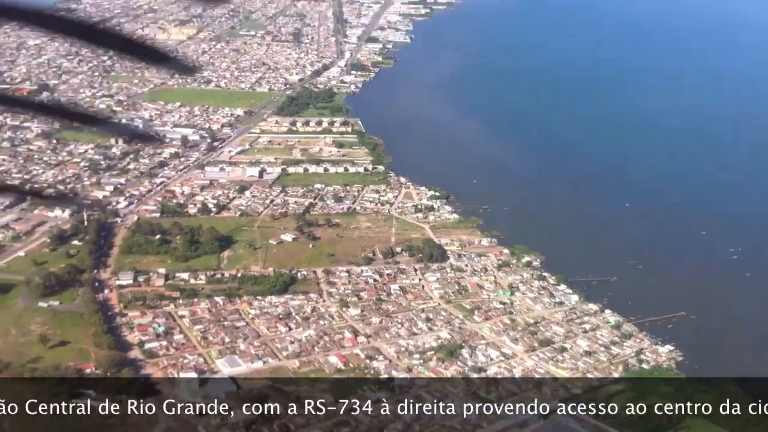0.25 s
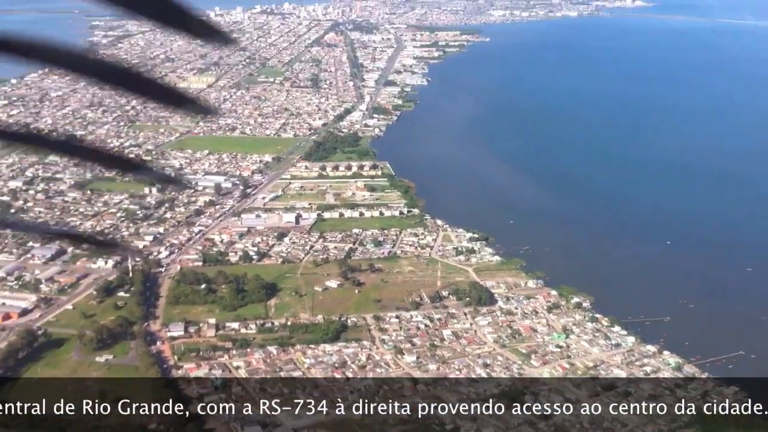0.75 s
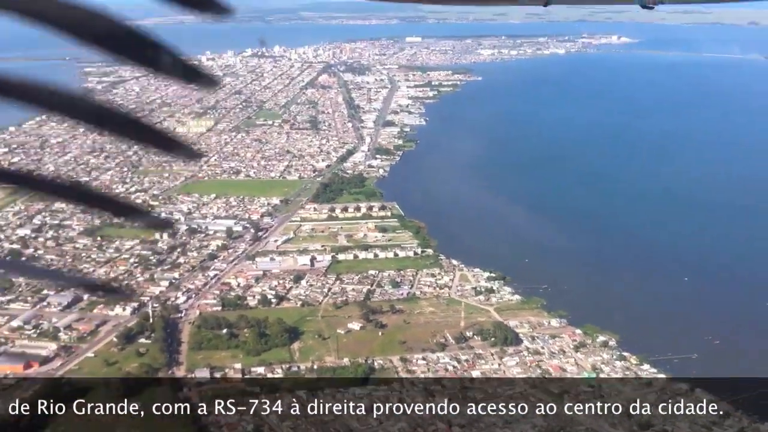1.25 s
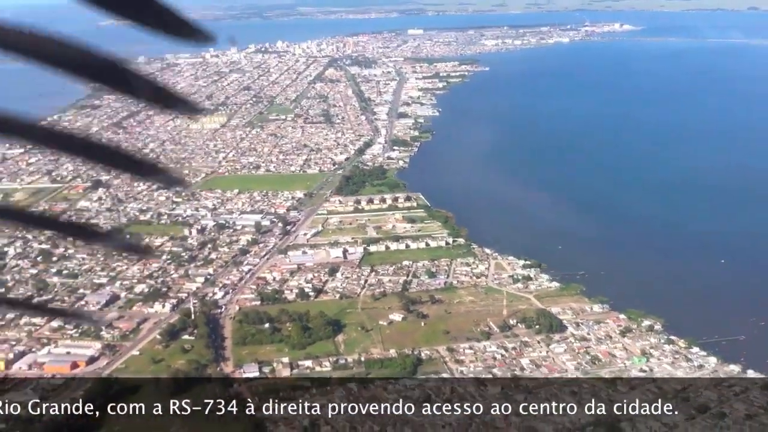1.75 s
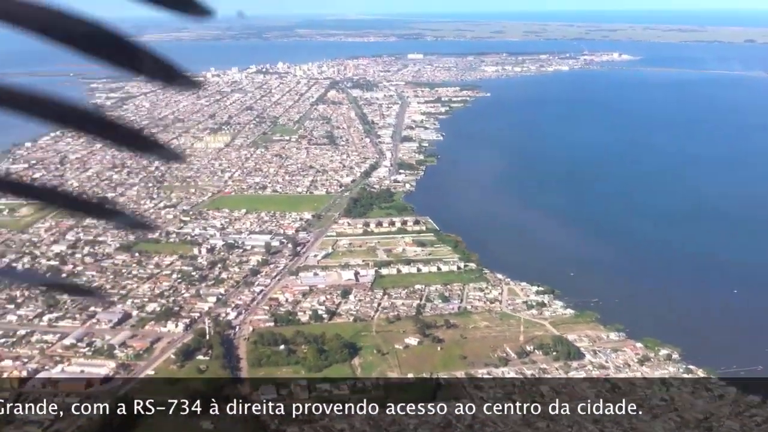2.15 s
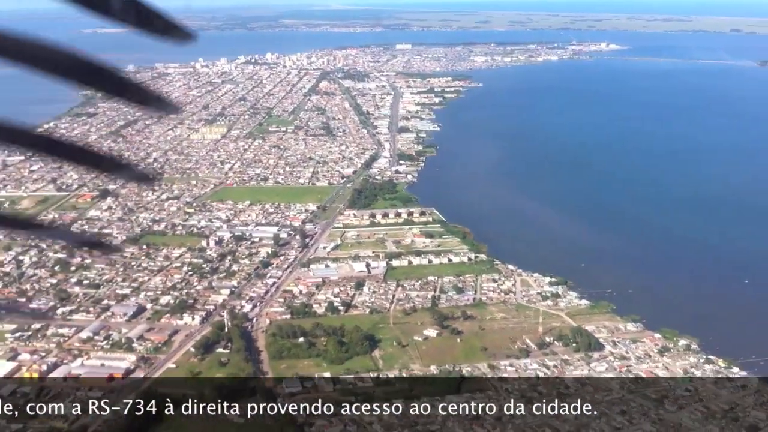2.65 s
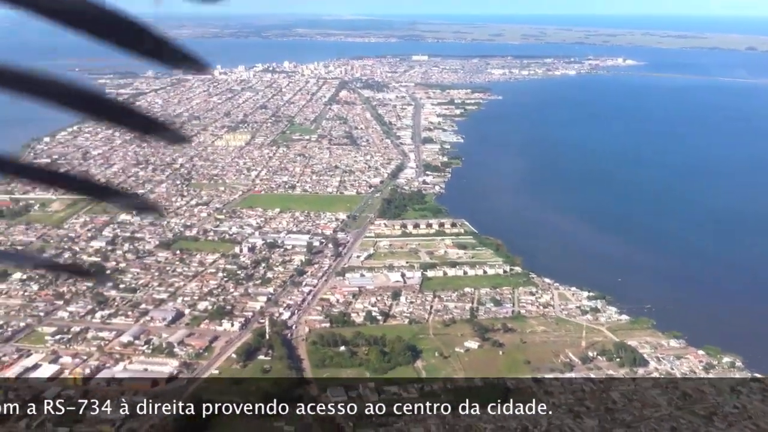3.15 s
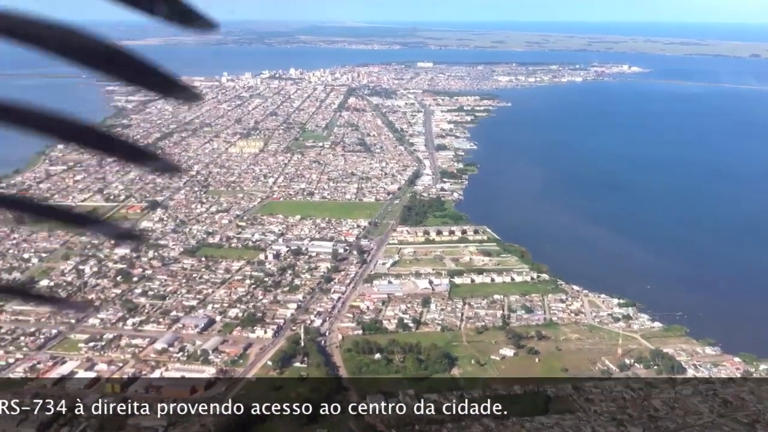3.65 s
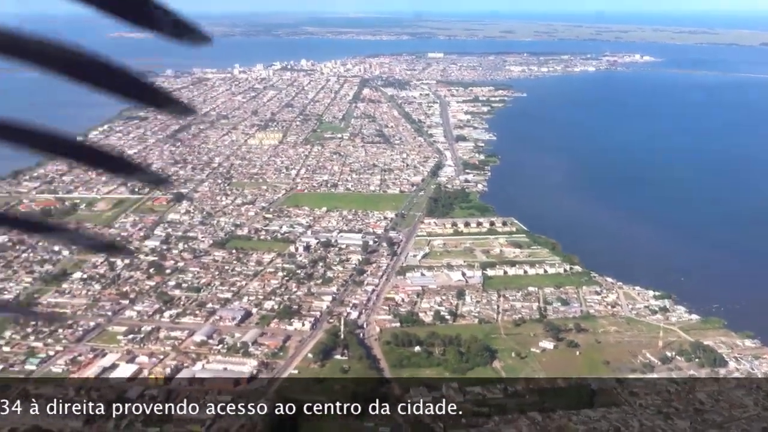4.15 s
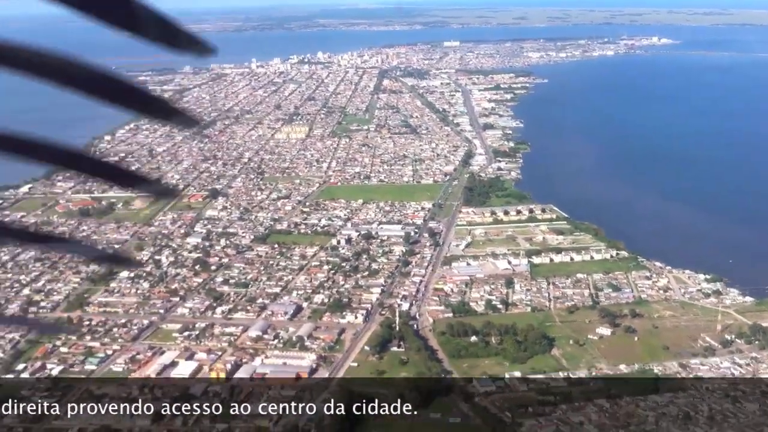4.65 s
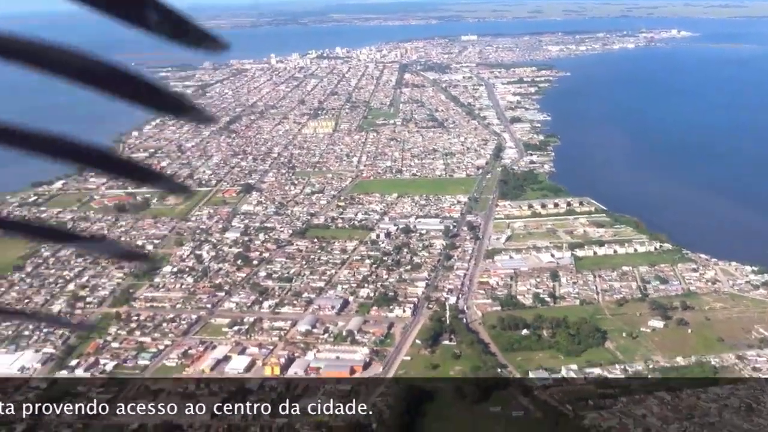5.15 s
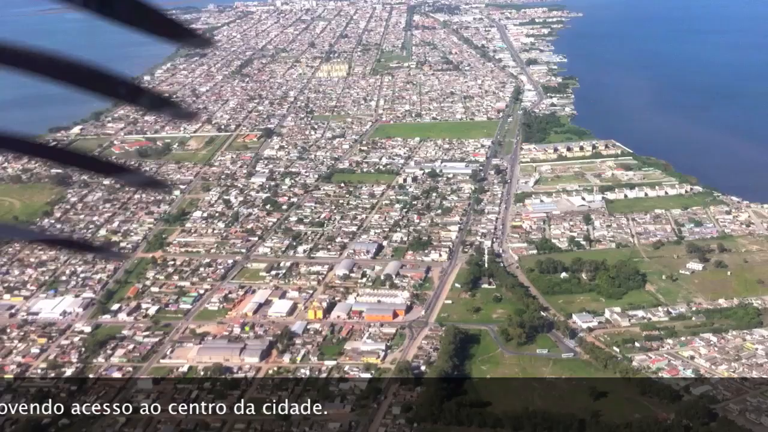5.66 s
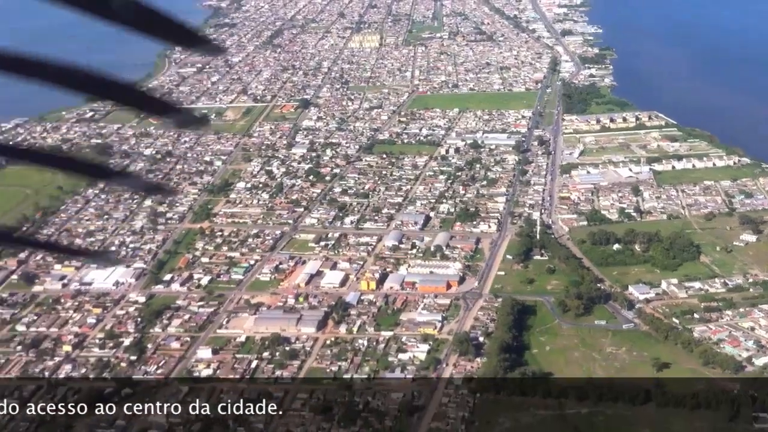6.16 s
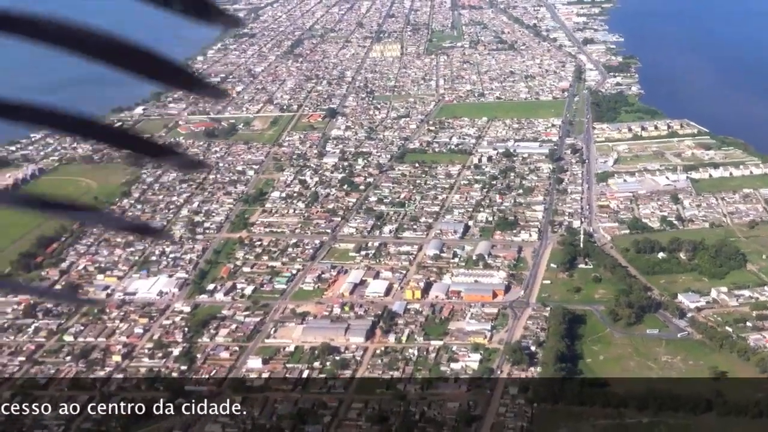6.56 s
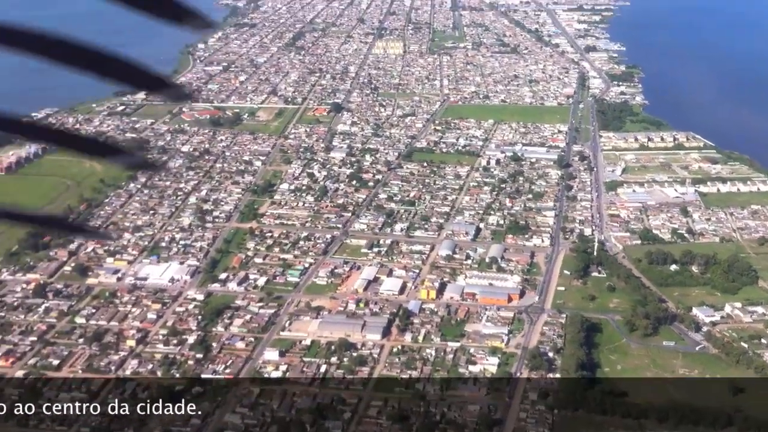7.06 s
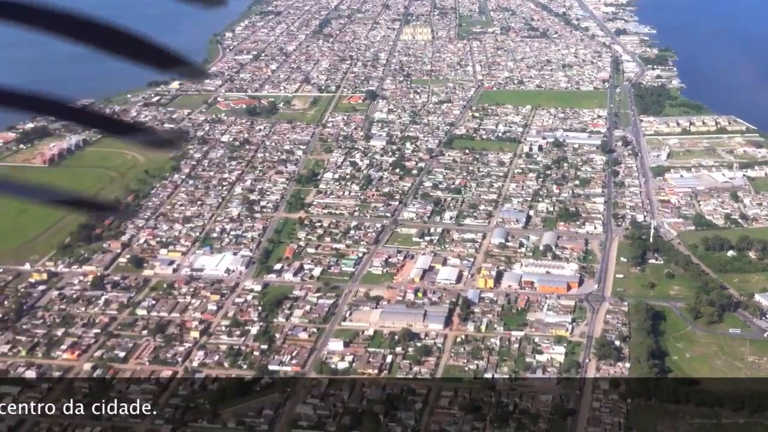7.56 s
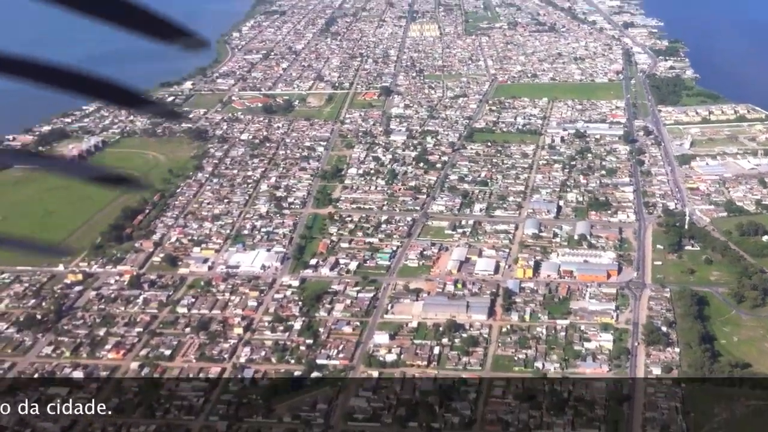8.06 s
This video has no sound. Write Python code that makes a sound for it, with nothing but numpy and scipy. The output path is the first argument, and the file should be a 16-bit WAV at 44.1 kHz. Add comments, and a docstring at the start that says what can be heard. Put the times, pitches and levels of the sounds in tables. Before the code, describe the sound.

Steady low propeller hum swells and fades in slow beats within an airplane cabin, with dull wind roar and a thin, fuzzy engine whine.

```python
"""Inside the cabin of a twin turboprop in cruise. Two propellers, as sums of blade tones at slightly different
speeds, swell and cancel about once a second over a roar of air (coloured noise) and a fuzzy engine whine
(narrow noise bands); a limiter ducks the whole mix on the swells. Faint treble hisses come at 1.7, 4.9 and 7.6 s.
From 6 s the whine steps up in pitch and drops away; from 7.5 s the propellers almost lock, the beat slows,
and the whine returns."""
import sys
import numpy as np
from scipy import signal
from scipy.fft import rfft, irfft
from scipy.io import wavfile
from scipy.ndimage import uniform_filter1d, minimum_filter1d

SR = 44100
rng = np.random.default_rng(int(sys.argv[2]) if len(sys.argv) > 2 else 0)


def wrap_up_sound(samples):
    """Save the sound to the file named by the first command line argument, as 16-bit audio."""
    columns = np.atleast_2d(samples).T
    # keep every value between -1 and 1, then stretch to whole-number steps
    tamed = np.clip(columns, -1, 1)
    steps = np.round(tamed * 32767).astype(np.int16)
    wavfile.write(sys.argv[1], SR, steps)


N = 366912


def gain_of(db):
    """Decibels to amplitude."""
    return 10 ** (np.asarray(db) / 20)


def evened(x):
    """Scales to rms 1."""
    return x / np.sqrt(np.mean(x ** 2) + 1e-20)


def curve(rows):
    """The second column of a time table, joined by straight lines."""
    times, values = np.transpose(rows)
    return np.interp(np.arange(N) / SR, times, values)


def noise(shape):
    """Noise of rms 1 whose amplitude spectrum follows shape(Hz)."""
    spectrum = rfft(rng.standard_normal(N))
    return evened(irfft(spectrum * shape(np.fft.rfftfreq(N, 1 / SR)), N))


def bell(f, hz, width):
    """Response of a resonance: 1 at its centre, half at half the width to either side."""
    return 1 / (1 + (2 * (f - hz) / width) ** 2)


def wander(rate_hz):
    """Slow random drift of rms 1, with little movement above the given rate."""
    return noise(lambda f: 1 / (1 + (f / rate_hz) ** 4))


def hisses(centre_hz=7800, width_hz=3000):
    """A few soft, short puffs of treble: band noise under bell-shaped swells."""
    # faint brief puffs: (time [s], length [s], level [dB])
    puffs = [(1.666, .04, -49), (4.9, .06, -46), (7.622, .04, -45)]
    t = np.arange(N) / SR
    swell = sum(gain_of(db) * np.exp(-(2 * (t - middle) / length) ** 2) for middle, length, db in puffs)
    return swell * noise(lambda f: bell(f, centre_hz, width_hz))


def whine(step_s=6.3, glide_s=0.2, step_hz=23.94):
    """Turbine and gear tones, smeared into narrow bands of noise that step up in pitch together."""
    # the cluster of fuzzy lines: (frequency [Hz], width [Hz], level before the fades [dB])
    whine_lines = [(2584, 70, -53), (2657, 31, -45.5), (2700, 69, -44), (2770, 50, -49.5), (2834, 60, -55)]
    # the whine holds nearly steady, drops away, then returns: (time [s], level [dB])
    whine_level = [(0, 0), (6.0, 1), (6.5, -6.5), (7.9, -2.5), (8.32, 0)]
    lines = sum(gain_of(db) * noise(lambda f: bell(f, hz, width)) for hz, width, db in whine_lines)
    step = .5 + .5 * np.tanh((np.arange(N) / SR - step_s) / glide_s)  # smooth rise from 0 to 1
    shift = np.exp(2j * np.pi * np.cumsum(step_hz * step) / SR)
    shifted = (signal.hilbert(lines) * shift).real  # moves every line by the same number of Hz
    return gain_of(curve(whine_level)) * shifted


def airflow(level_db=-13, flutter_db=0.33, ripple_db=1.25, mode_spacing_hz=70):
    """Turbulence along the fuselage, muffled by the wall and coloured by the cabin."""
    # airflow heard through the wall: (frequency [Hz], relative level [dB per Hz])
    wall_slope = [(30, -47), (75, -28), (115, -13), (155, -2.5), (290, 0), (400, -3.5), (510, -11),
                  (1100, -23.5), (1750, -32.5), (3100, -38.5), (5000, -46), (8000, -49), (13500, -46.5),
                  (15800, -52)]
    # resonances of cabin air and wall panels: (frequency [Hz], width [Hz], lift [dB])
    resonances = [(94.3, 9.5, 8), (246, 20.5, 3), (594, 51, 7), (720, 32, 3), (877, 77, 5), (1258, 43, 4),
                  (1378, 76, 5), (1930, 130, 2), (11170, 800, 3)]
    slope_hz, slope_level_db = np.transpose(wall_slope)
    ripple = rng.standard_normal(SR // 20)  # countless weak, overlapping cabin modes

    def colour(f):
        """The wall's slope with the cabin's resonances on top."""
        slope_db = np.interp(np.log(f + 1), np.log(slope_hz), slope_level_db)
        strong_db = sum(lift * bell(f, centre, width) for centre, width, lift in resonances)
        weak_db = ripple_db * np.interp(f / mode_spacing_hz, np.arange(len(ripple)), ripple)
        weak_db = weak_db * f / (f + 1000)  # weak modes crowd the upper range
        return gain_of(slope_db + strong_db + weak_db)

    flutter = gain_of(level_db + flutter_db * wander(rate_hz=17))
    return flutter * noise(colour)


def propeller(turns, levels_db, dispersion=0, sway_db=0.76, jitter=0.0055):
    """Blade tones of one propeller; turbulent inflow shakes their strength and timing, the upper ones most."""
    turns = turns + jitter * wander(rate_hz=6)  # turns and jitter count blade passes
    drone = np.zeros(N)
    for k, db in levels_db:
        early = dispersion * (k - 1)  # bending waves in the skin carry the upper tones faster
        strength = gain_of(db + k * sway_db * wander(rate_hz=6.6))
        drone += strength * np.cos(2 * np.pi * (k * turns + early))
    return np.sqrt(2) * drone  # makes the tone levels rms levels


def propellers(blade_hz=155.95, sag_hz_per_s=0.14, near_lead=0.285):
    """The far propeller sets a slightly sagging pace; the near one slowly overtakes it, so their tones beat."""
    # blade tones in the cabin: (multiple of the blade rate, near propeller level [dB], far propeller level [dB])
    blade_tones = [(1, -7.5, -11), (2, -24.4, -21), (3, -33.5, -40), (4, -54, -44)]
    # how much faster the near blades pass, which is the beat rate: (time [s], difference [Hz])
    slip = [(0, 1.08), (2.6, .87), (4.1, .93), (5.1, .65), (7.0, .97), (7.5, .33)]
    order, near_db, far_db = np.transpose(blade_tones)
    order = np.round(order)
    far_turns = np.cumsum(blade_hz - sag_hz_per_s * np.arange(N) / SR) / SR
    near_turns = far_turns + near_lead + np.cumsum(curve(slip)) / SR  # head start in blade passes
    near = propeller(near_turns, zip(order, near_db))
    far = propeller(far_turns, zip(order, far_db), dispersion=.11)  # its sound travels round the fuselage
    return near + far


def scene():
    """Everything that reaches the microphone at the window seat."""
    return (hisses() + whine() + airflow() + propellers())[None]


def limiter(x, threshold_db=-4.5, firmness=0.83, recovery_db_per_s=24, size=40):
    """Each peak over the threshold pulls the gain down within a millisecond; it then creeps back up."""
    over_db = firmness * np.maximum(20 * np.log10(abs(x) + 1e-9) - threshold_db, 0)
    creep_db = recovery_db_per_s * np.arange(N) / SR
    duck_db = creep_db - np.maximum.accumulate(over_db + creep_db)
    smooth_db = uniform_filter1d(minimum_filter1d(duck_db, size), size)  # size in samples
    return x * gain_of(smooth_db)


def record(dry):
    """The limiter, then a steep low-pass that removes the highest treble."""
    low_pass = signal.firwin(511, 15720, window=("kaiser", 9), fs=SR)  # cutoff in Hz
    return signal.oaconvolve(limiter(dry[0]), low_pass, "same")[None]


dry = scene()
out = record(dry)
wrap_up_sound(out)
```